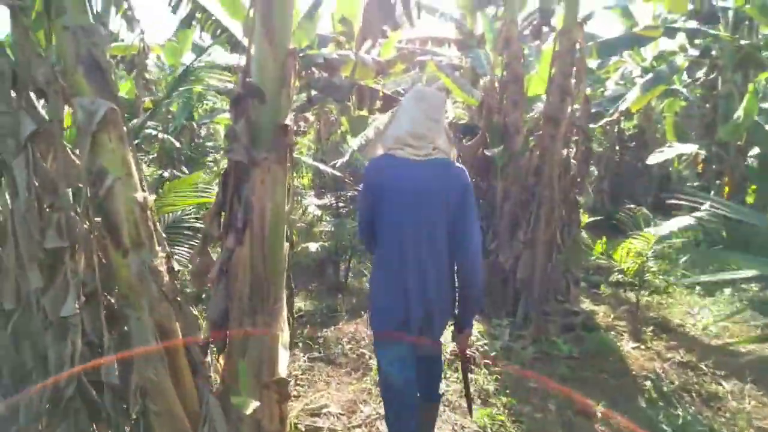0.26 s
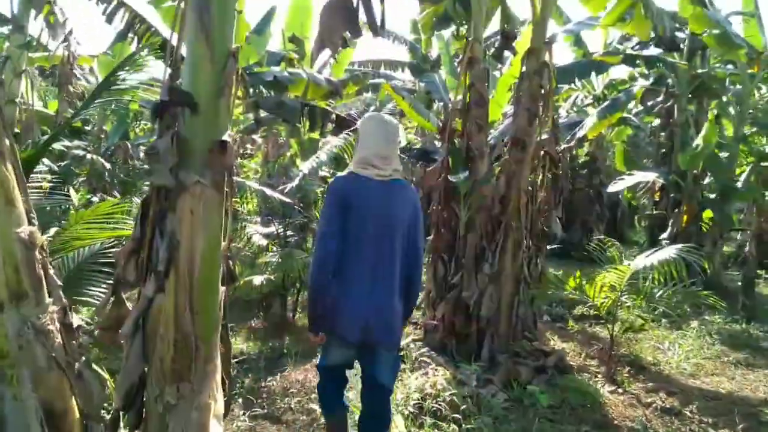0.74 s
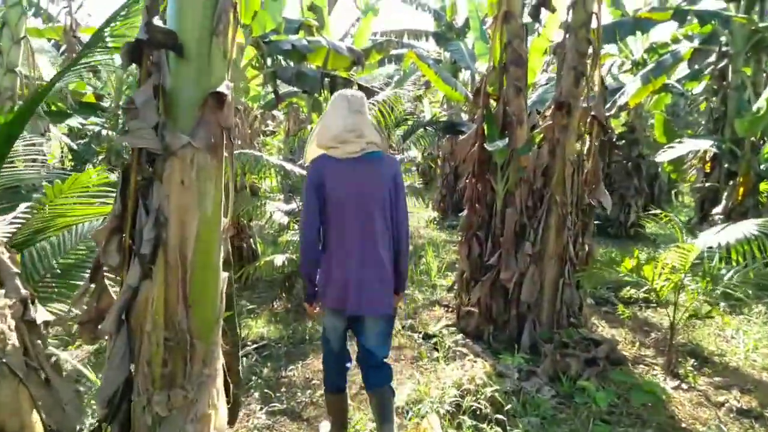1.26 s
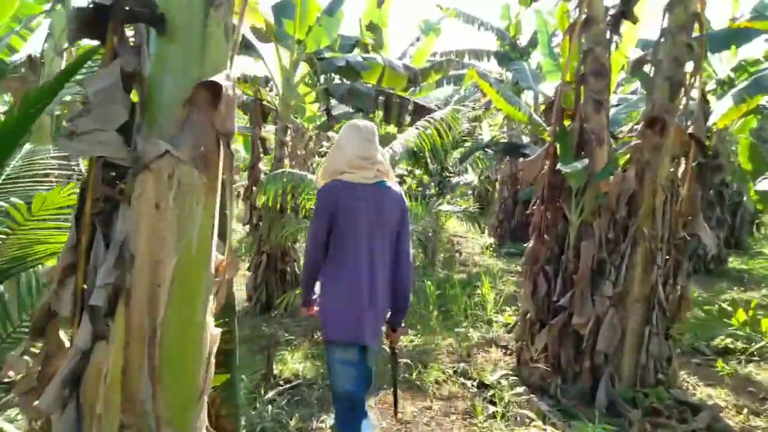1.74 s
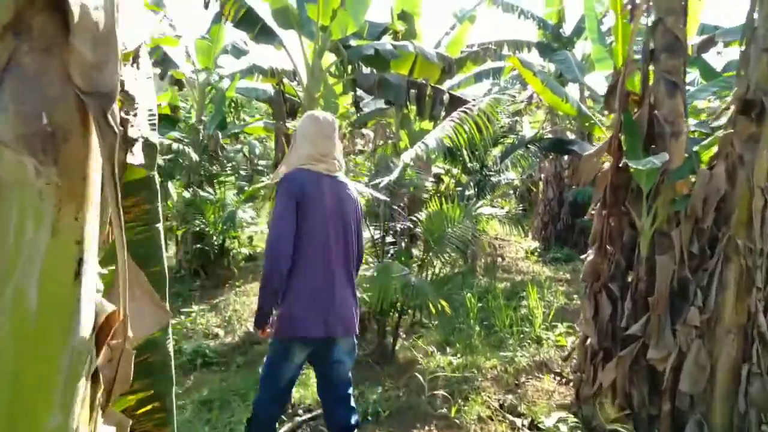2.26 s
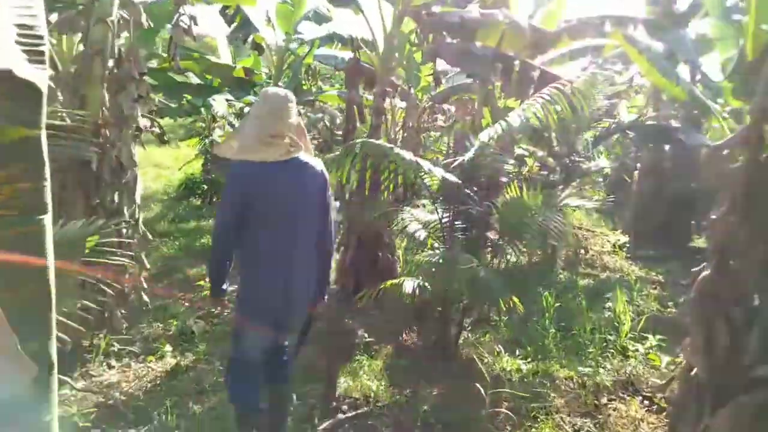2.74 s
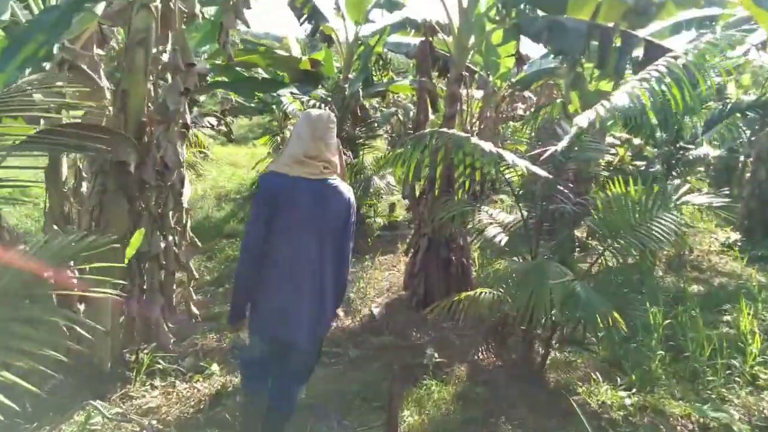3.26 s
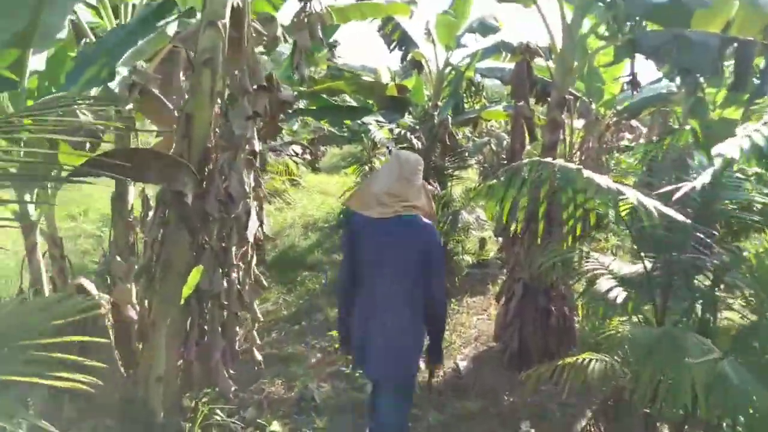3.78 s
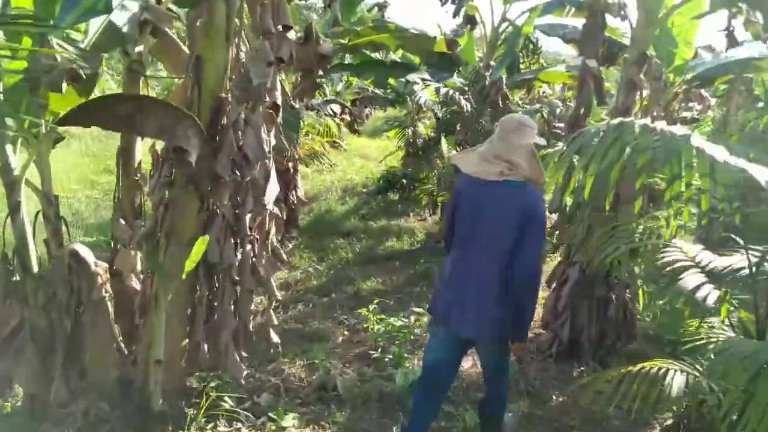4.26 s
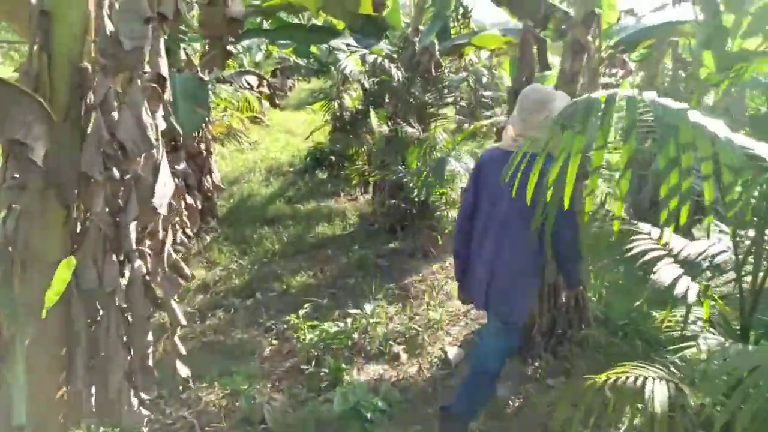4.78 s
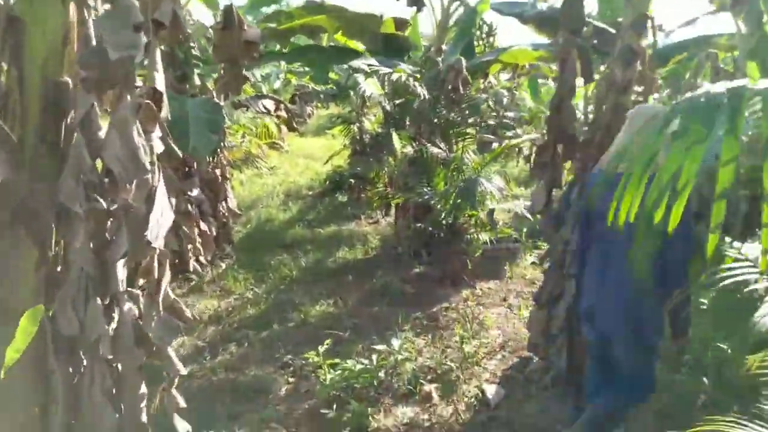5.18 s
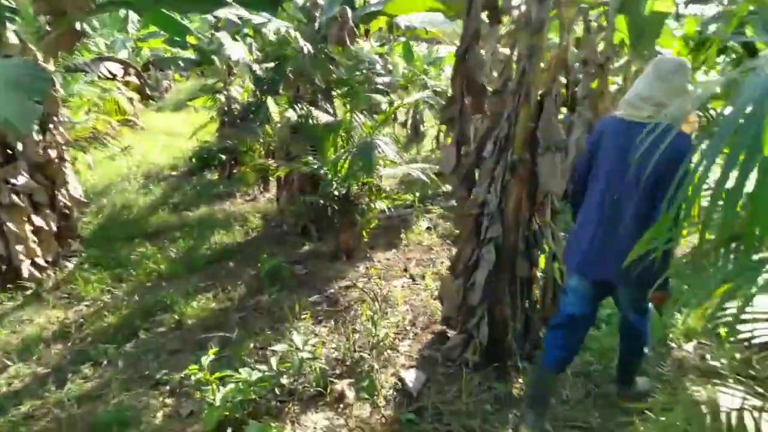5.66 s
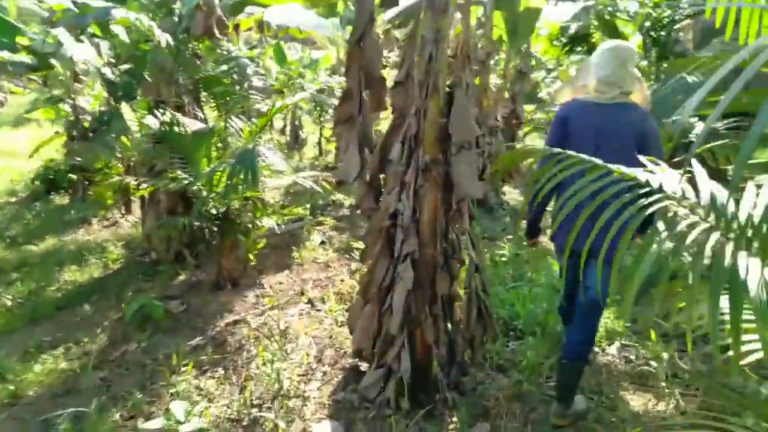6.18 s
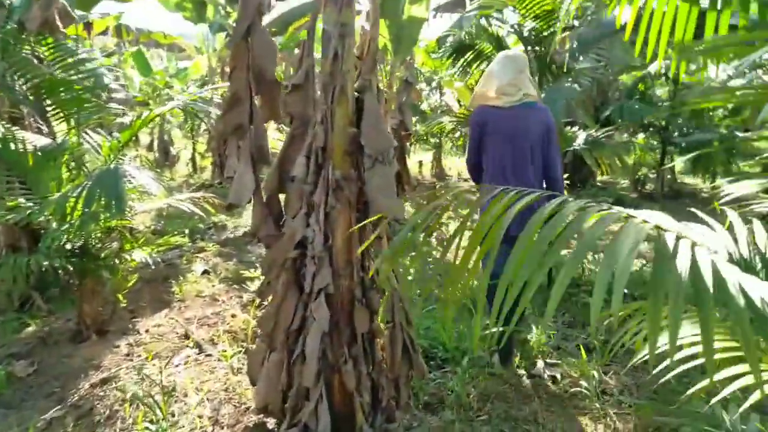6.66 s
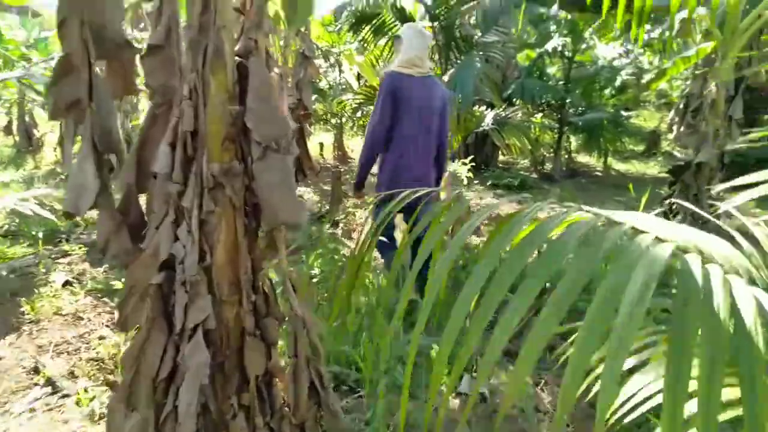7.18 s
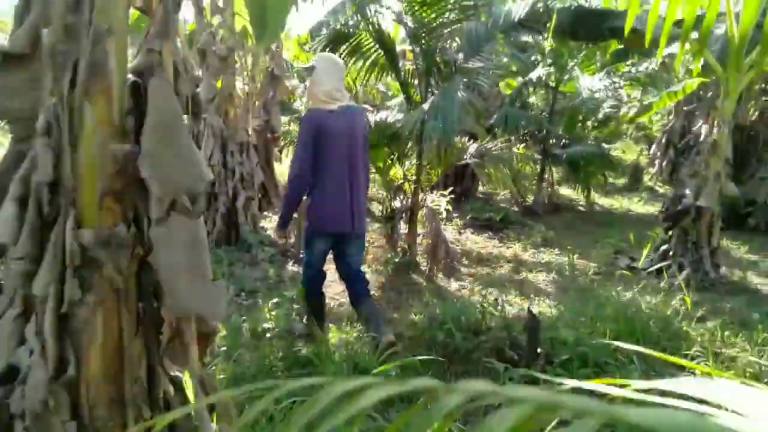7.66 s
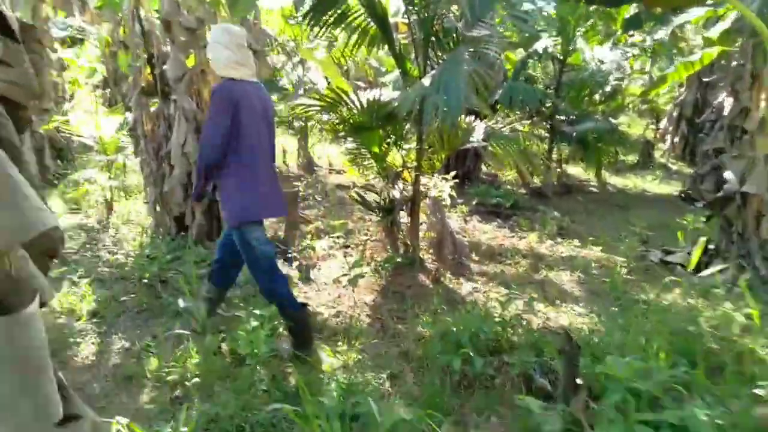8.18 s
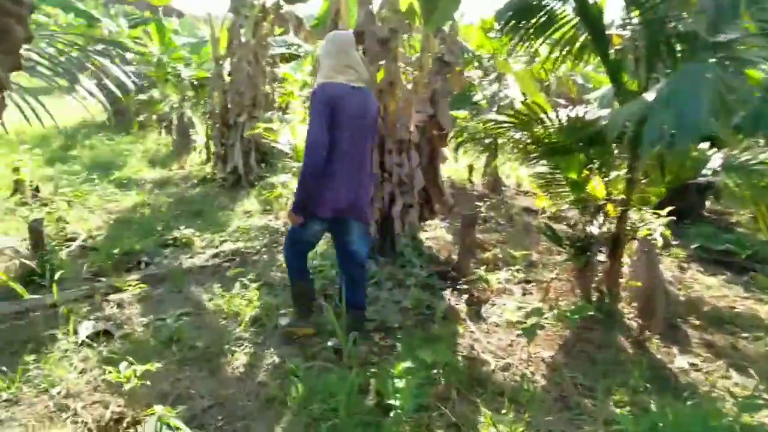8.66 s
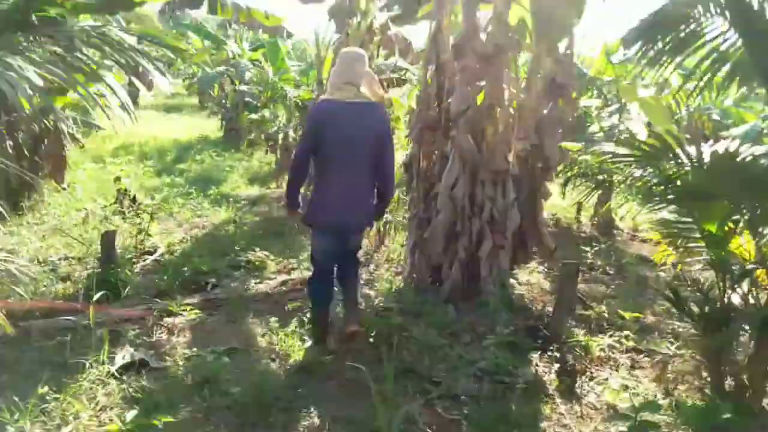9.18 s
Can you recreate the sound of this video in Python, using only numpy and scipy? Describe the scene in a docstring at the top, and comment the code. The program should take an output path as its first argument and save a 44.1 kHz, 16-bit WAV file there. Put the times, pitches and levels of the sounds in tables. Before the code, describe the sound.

Someone moves through dry leaf litter on a plantation path, outdoors and without echo. Short crackling swishes follow one another irregularly, with brittle twig snaps. The handheld microphone picks up scraping, rumbling rubs and knocks ending in low thuds, densest and loudest in the middle. A very faint high insect whine lies at the start, and a distant bird whistles once later.

```python
"""Dry leaves rustle in swishes over a faint insect whine as someone walks a plantation path.
Leaves are showers of random microfractures; twigs are noise-tailed impulses in damped resonances.
Stick-slip friction rubs the handheld microphone's case, and knocks on it end in a short low thud.
Far off a bird gives one thin whistle: it and the insect are wavering sine tones."""
import sys
import numpy as np
from scipy import signal
from scipy.fft import rfft, irfft
from scipy.io import wavfile
from scipy.ndimage import uniform_filter1d

SR = 44100
rng = np.random.default_rng(int(sys.argv[2]) if len(sys.argv) > 2 else 0)


def digitize_waveform(pressure):
    """Quantize a signal to 16-bit integers and store it at the path in sys.argv[1].

    Rows of a 2-D input are taken as channels; values are limited to [-1, 1].
    """
    field = np.atleast_2d(pressure).T
    bounded = np.clip(field, -1, 1)
    quanta = np.round(bounded * 32767).astype(np.int16)
    wavfile.write(sys.argv[1], SR, quanta)


N = 415863
TIME = np.arange(N) / SR
HIT = 2048  # samples in a short sound, and in the design of the colour filters
THUD_HZ, THUD_WIDTH_HZ = 94, 80  # the microphone's resonant high-pass: little passes below it, and hits ring briefly near it


def undb(db):
    """Decibel law: level in dB to amplitude gain."""
    return 10 ** (np.asarray(db) / 20)


def unit(x):
    """Normalization: scale to rms 1."""
    return x / np.sqrt(np.mean(x ** 2))


def curves(table):
    """Linear interpolation: each column after t/s as a curve over time."""
    s, *columns = np.transpose(table)
    return [np.interp(TIME, s, c) for c in columns]


def colour(x, points):
    """Minimum-phase filtering: a causal response through (f/Hz, gain/dB) points."""
    hz, db = np.transpose(points)
    log_hz = np.log(np.fft.rfftfreq(HIT, 1 / SR) + 1)
    log_gain = np.log(undb(np.interp(log_hz, np.log(hz), db)))
    # folding the cepstrum onto positive times makes the response causal
    cepstrum = irfft(log_gain)
    cepstrum[1:HIT // 2] *= 2
    cepstrum[HIT // 2 + 1:] = 0
    response = irfft(np.exp(rfft(cepstrum)))
    return signal.fftconvolve(x, response)[:N]


def resonate(x, hz, width_hz, order):
    """Damped oscillator on a short sound: order 0 passes lows, 1 the band, 2 highs."""
    s = 1j * np.fft.rfftfreq(HIT, 1 / SR) / hz
    return irfft(rfft(x) * s ** order / (1 + s * width_hz / hz + s ** 2))


def hit_level(x, db):
    """Energy normalization: scale a short sound to a level taken over 10 ms."""
    return x * undb(db) * np.sqrt(SR / 100 / np.sum(x ** 2))


def add(track, s, x):
    """Superposition: mix a short sound in at time s."""
    i = int(np.clip(s * SR, 0, N - 1))
    track[i:i + HIT] += x[:N - i]


def crackle(rate, spread_db, ring_ms, bed):
    """Shot noise: random, mostly weak fractures (rate per second) decay over a bed of merged ones."""
    sizes = undb(spread_db * np.minimum(rng.exponential(size=N), 3.5))
    power = (rng.random(N) < rate / SR) * sizes ** 2
    decay = np.exp(-2000 / (ring_ms * SR))  # power falls twice as fast as amplitude
    power = signal.lfilter([1], [1, -decay], power)
    return np.sqrt(power / power.mean() + bed) * rng.standard_normal(N)


def shifting(x, depth_db, size):
    """Spectral modulation: bands about 400 Hz wide come and go over some `size` frames of 6 ms; rms 1."""
    frames = signal.stft(x, nperseg=512)[2]
    field = rng.standard_normal(frames.shape)
    field = uniform_filter1d(field, size=5, axis=0)
    field = uniform_filter1d(field, size=size, axis=1)
    return unit(signal.istft(frames * undb(depth_db * unit(field)))[1][:N])


def stroke(start_s, attack_s, hold_s, sag_db, release_s):
    """Envelope of one movement: linear build-up, a hold that sags by sag_db, exponential release."""
    age = TIME - start_s
    attack_s, hold_s = max(attack_s, .001), max(hold_s, .001)
    held = np.clip((age - attack_s) / hold_s, 0, 1)
    released = np.clip((age - attack_s - hold_s) / release_s, 0, 20)
    return np.clip(age / attack_s, 0, 1) * undb(-sag_db * held) * np.exp(-released)


def tone(hz, db, waver, flutter_db, size):
    """Frequency and amplitude modulation: pitch wavers by the share `waver`, level flutters over `size` samples."""
    drift = unit(uniform_filter1d(rng.standard_normal(N), size=220))
    flutter = uniform_filter1d(rng.standard_normal(N), size=size)
    flutter = unit(uniform_filter1d(flutter, size=size))
    phase = 2 * np.pi * np.cumsum(hz * (1 + waver * drift)) / SR
    return np.sqrt(2) * undb(db + flutter_db * flutter) * np.sin(phase)


# an insect's thin high whine, strongest in the first second and a half: t/s, level before flutter/dB
INSECT_LEVEL = [(0, -67), (1.3, -68), (1.9, -76)]
# a bird's thin rising whistle: t/s, f before waver/Hz, level before flutter/dB
BIRD_WHISTLE = [(6.2, 6750, -68), (6.25, 6950, -59), (6.33, 7120, -56), (6.46, 7650, -72)]


def wildlife():
    """Modulated pure tones: a faint insect whine and one distant bird whistle."""
    insect = tone(9300, curves(INSECT_LEVEL)[0], waver=0.0027, flutter_db=4.0, size=2500)
    hz, db = curves(BIRD_WHISTLE)
    singing = (TIME > BIRD_WHISTLE[0][0]) & (TIME < BIRD_WHISTLE[-1][0])
    return insect + singing * tone(hz, db, waver=0.0059, flutter_db=7.5, size=300)


# the hand's grip creeps on the case all the time: t/s, rumble level/dB
GRIP_CREEP = [(0, -42.5), (.7, -63.5), (1.4, -53), (2.1, -59.5), (2.7, -56), (2.98, -67.5), (3.7, -52.5),
              (4.6, -57.5), (5.2, -45.5), (6.25, -48.5), (6.42, -66.5), (7.6, -72), (7.9, -37), (8.1, -71),
              (8.5, -46.5), (9.4, -58.5)]
# a frond or a finger slides over the case: start t/s, attack and hold length/s,
# rumble level/dB, scrape level/dB (both at the end of the attack)
CASE_SCUFFS = [(0.116, 0.023, -50, -44), (0.17, 0.044, -35.5, -36), (0.203, 0.072, -41, -55),
               (0.687, 0.017, -38, -31), (1.43, 0.058, -45, -45), (1.792, 0.12, -44, -41),
               (2.242, 0.04, -35.5, -52), (3.031, 0.038, -31.5, -41), (3.383, 0.046, -40.5, -53),
               (3.523, 0.052, -37, -53), (3.656, 0.11, -50, -56), (3.806, 0.19, -45.5, -42),
               (4.061, 0.042, -31, -55), (4.111, 0.035, -37.5, -43), (4.27, 0.081, -70, -42.5),
               (4.38, 0.034, -24.5, -31), (4.47, 0.043, -27, -40), (4.592, 0.013, -38, -33.5),
               (4.618, 0.044, -30, -50.5), (4.727, 0.07, -26, -44), (4.905, 0.078, -52, -42.5),
               (5.006, 0.066, -44.5, -45.5), (5.137, 0.13, -50, -45.5), (5.313, 0.041, -58, -30.5),
               (5.614, 0.058, -28, -35.5), (5.674, 0.056, -40, -44), (5.796, 0.017, -30.5, -39),
               (5.82, 0.057, -28, -30.5), (5.967, 0.081, -63, -45), (6.055, 0.016, -41, -55),
               (6.115, 0.09, -29.5, -36), (6.479, 0.012, -38.5, -70), (6.562, 0.041, -46.5, -44),
               (6.655, 0.1, -46, -48), (6.953, 0.035, -45, -41), (7.671, 0.045, -32, -22.5),
               (7.878, 0.016, -50, -36), (8.203, 0.063, -37, -44), (8.284, 0.16, -46, -57),
               (8.693, 0.079, -44.5, -47), (8.959, 0.065, -36, -34), (9.122, 0.11, -48, -42),
               (9.19, 0.046, -39, -50), (9.287, 0.048, -28, -44)]


def case_friction(leaf_gain):
    """Power addition: scuffs, creeping grip and stalks dragged with the leaves give rumble and scrape gains."""
    attack_s = .01
    grip = undb(curves(GRIP_CREEP)[0])
    # scrape of the grip is relative to its rumble; stalks are relative to the leaves they carry
    rumble = grip ** 2 + (leaf_gain * undb(-24.5)) ** 2
    scrape = (grip * undb(-5.5)) ** 2 + (leaf_gain * undb(-17.5)) ** 2
    for s, length_s, rumble_db, scrape_db in CASE_SCUFFS:
        # a negative sag: the scuff grows while it is held
        power = stroke(s, attack_s, length_s - attack_s, sag_db=-1.5, release_s=0.0063) ** 2
        rumble = rumble + power * undb(rumble_db) ** 2
        scrape = scrape + power * undb(scrape_db) ** 2
    return np.sqrt(rumble), np.sqrt(scrape)


# spectral shape of slow jerks on the case: f/Hz, relative level/dB
RUMBLE_SPECTRUM = [(25, -60), (60, -4.5), (110, 0.5), (200, -5.5), (350, -11.5), (600, -23), (1500, -61.5)]
# spectral shape of quick slips on the case: f/Hz, relative level/dB
SCRAPE_SPECTRUM = [(200, -4.5), (450, -0.5), (700, 3), (1100, 0.5), (1800, -2), (2800, -8.5), (6000, -26.5),
                   (12000, -53)]


def rubbing(rumble_gain, scrape_gain):
    """Stick-slip friction on the case: slow jerks rumble, quick slips scrape."""
    jerks = crackle(rate=250, spread_db=5.5, ring_ms=1.0, bed=0.14)
    slips = crackle(rate=600, spread_db=9.5, ring_ms=0.67, bed=0.84)
    slips = shifting(slips, depth_db=4.0, size=7)
    rumble = unit(colour(jerks, RUMBLE_SPECTRUM))
    scrape = unit(colour(slips, SCRAPE_SPECTRUM))
    return rumble_gain * rumble + scrape_gain * scrape


def knock(db, hz, strain_ms, chatter_ms, chatter, catch_share, strain_share, wood_hz, wood):
    """Impact excitation: a stem catches, strains and lets go, rings and chatters, and the microphone's high-
    pass adds a short low ring."""
    ms = 1000 * np.arange(HIT) / SR - 8  # the release is at 0
    release = signal.unit_impulse(HIT, np.argmin(np.abs(ms)))
    catch = signal.unit_impulse(HIT, np.argmin(np.abs(ms + strain_ms)))
    strain = np.maximum(ms + max(strain_ms, .1), 0) * (ms <= 0)
    force = release + catch_share * catch - strain_share * strain / strain.sum()
    push = hit_level(resonate(force, hz, 1.7 * hz, order=0), 0)

    ring_hz = wood_hz * np.exp(0.38 * rng.standard_normal())  # each stem differs
    ring = hit_level(resonate(force, ring_hz, 330, order=1), 0)

    rattle = rng.standard_normal(HIT) * np.exp(-np.abs(ms) / chatter_ms) * (ms > -strain_ms)
    rattle = resonate(rattle, hz, 1.5 * hz, order=0)
    # the chatter is too light to move the whole case, so it carries little bass
    shake = hit_level(resonate(rattle, 160, 200, order=2), 0)

    hardness = min(hz / 900, 1)  # a soft contact hardly rings or chatters
    contact = hit_level(push + hardness * (chatter * shake + wood * ring), db)
    return resonate(contact, THUD_HZ, THUD_WIDTH_HZ, order=2)


# knocks on the case: t/s, contact level over 10 ms before the microphone's high-pass and the case colour/dB, #
# contact hardness as corner f/Hz, strain before it lets go/ms
CASE_KNOCKS = [(0.182, -35, 744, 3.8), (0.199, -34, 2560, 1.2), (0.698, -26, 4000, 1.9),
               (1.181, -20.5, 1940, 0.79), (1.1957, -30, 830, 3.6), (1.304, -20, 1030, 0.99),
               (1.4404, -25, 1560, 1.62), (1.837, -29.5, 1460, 0.53), (1.8624, -16.5, 650, 0.3),
               (1.8754, -26.5, 840, 0.28), (1.8926, -23.5, 1300, 1.4), (2.1568, -14.5, 1070, 2.13),
               (2.1865, -18, 1050, 1.64), (2.257, -13.5, 1050, 2.42), (2.653, -24.5, 1680, 0.98),
               (3.3357, -27.5, 1180, 0.47), (3.4031, -22, 640, 0.88), (3.7028, -20, 2290, 1.06),
               (3.7671, -19.5, 1460, 0.37), (3.8103, -25.5, 1480, 0.28), (3.8236, -26.5, 1170, 0.34),
               (3.8627, -26.0, 530, 0.6), (3.9191, -32, 3500, 1.06), (4.075, -10.5, 224, 2.36),
               (4.1223, -16.5, 2120, 1.48), (4.3, -27, 4000, 0.81), (4.387, -23, 670, 0.31),
               (4.406, -24, 670, 4.5), (4.4108, -14, 615, 1.0), (4.4201, -22, 270, 0.71),
               (4.4822, -17.5, 1100, 0.55), (4.4899, -7, 1120, 1.1), (4.493, -16, 684, 1.1),
               (4.516, -16, 1500, 2.3), (4.522, -23.5, 670, 0.69), (4.6446, -8.5, 800, 0.42),
               (4.649, -16.5, 220, 0.78), (4.783, -18, 202, 6.1), (4.907, -22.0, 496, 0.9),
               (4.941, -23, 1310, 0.94), (5.164, -26.5, 493, 3.2), (5.4113, -13, 1220, 1.1),
               (5.4211, -21, 664, 4.4), (5.4914, -19, 1370, 2.74), (5.6, -26, 380, 0.46),
               (5.637, -18, 340, 5.4), (5.704, -18, 138, 0.6), (5.8494, -35, 950, 0.22),
               (5.882, -27, 199, 5.6), (6.0459, -18, 840, 0.22), (6.0636, -20.5, 170, 0.26),
               (6.1106, -29.5, 380, 2.7), (6.134, -29, 200, 4.6), (6.184, -21.5, 300, 1.0),
               (6.552, -25.5, 110, 0.91), (6.704, -31.5, 1820, 0.95), (6.9768, -41.5, 1830, 1.8),
               (7.342, -29.5, 1620, 0.95), (7.646, -27.5, 3200, 2.8), (7.6857, -19.5, 825, 0.39),
               (7.8966, -28, 4000, 2.4), (8.231, -20.5, 110, 1.0), (8.314, -21.5, 770, 0.96),
               (8.347, -17.0, 500, 0.72), (8.377, -22.5, 680, 0.54), (8.396, -23.5, 377, 0.53),
               (8.954, -15.5, 3200, 1.02), (8.9567, -15.5, 1070, 0.37), (9.1305, -28, 840, 0.45),
               (9.193, -16, 99, 1.1), (9.3204, -29.5, 340, 0.76), (9.352, -26.5, 312, 0.66)]
# how the case passes knocks: f/Hz, gain/dB
CASE_RESPONSE = [(300, 0), (900, -0.5), (2400, 0.5), (3600, -3.5), (6000, -2.5), (14000, -14.5)]


def knocks():
    """Structure-borne transmission: stems and fingers strike the case, which filters the blows."""
    out = np.zeros(N)
    for s, db, hz, strain_ms in CASE_KNOCKS:
        sound = knock(db, hz, strain_ms, chatter_ms=2.95, chatter=0.45, catch_share=0.31,
                      strain_share=0.56, wood_hz=1284, wood=0.18)
        add(out, s - .008, sound)  # the release falls on s
    return undb(0.1) * colour(out, CASE_RESPONSE)


def snap(db, hz, body_db, strain_ms, tail_ms, tail_db):
    """Brittle fracture: fibres give way, the piece breaks, the leaf around it shivers, the stalk recoils."""
    ms = 1000 * np.arange(HIT) / SR - 4  # the break is at 0
    fracture = signal.unit_impulse(HIT, np.argmin(np.abs(ms)))
    fade_ms = np.where(ms < 0, strain_ms, tail_ms)
    shiver = rng.standard_normal(HIT) * np.exp(-np.abs(ms) / fade_ms)
    burst = hit_level(fracture, 0) + hit_level(shiver, tail_db)
    crack = resonate(resonate(burst, hz, 4800, order=1), hz, 7300, order=1)
    recoil = resonate(burst, 1100, 1040, order=0)
    recoil = resonate(recoil, THUD_HZ, THUD_WIDTH_HZ, order=2)
    return hit_level(crack, db) + hit_level(recoil, db + body_db)


# twigs and leaf ribs snapping: t/s, crack level over 10 ms before colour and trim/dB,
# crack centre f/Hz, woody body level relative to the crack/dB
TWIG_SNAPS = [(0.3974, -15.5, 5100, -46), (0.4085, -18, 3970, -30), (0.417, -20, 4840, -37),
              (0.433, -25.5, 3520, -33), (0.6839, -20.5, 4000, -12), (0.7045, -11.5, 6530, -22.5),
              (0.854, -34.5, 3020, 0.5), (0.879, -42, 3000, 3), (0.94, -31.5, 4540, -23),
              (0.9952, -17.5, 4760, -27), (1.283, -26, 5430, -27), (2.322, -11, 7700, -17),
              (2.3286, -14, 5330, -18), (2.485, -34.5, 3450, -11), (2.7963, -24, 3600, -20),
              (3.095, -30, 3400, -7), (3.1036, -22, 3150, -41), (3.9177, -23.5, 3760, -2.5),
              (4.147, -24, 4840, -22), (4.4896, -26, 5840, -12), (4.6442, -36, 6400, -14),
              (4.756, -21, 13100, -34), (4.7736, -19, 12300, -21), (5.011, -31.5, 2840, -27),
              (5.464, -29, 4200, -35), (5.803, -26, 12900, -31), (6.0454, -19, 3600, 3.5),
              (6.187, -24, 3400, -1.5), (6.408, -40, 3940, -26), (6.5004, -22, 12700, -46),
              (7.0204, -28.5, 2850, -19), (7.118, -20, 12800, -46), (7.282, -31.5, 3120, -37),
              (7.699, -10, 5900, -17), (7.706, -16, 4130, -6), (7.8507, -16.5, 13200, -28),
              (7.862, -22, 13100, -27), (7.8938, -22, 4500, -7.5), (8.1743, -16, 13100, -59),
              (8.1806, -17, 12800, -38), (8.532, -23.5, 5300, -16.5), (8.563, -20.5, 5450, -28),
              (8.9985, -17, 5130, -11), (9.0047, -8.5, 7450, -19), (9.278, -22, 13100, -38),
              (9.3482, -9.5, 12400, -28), (9.354, -23, 12200, -24)]
# spectral colour of all snaps: f/Hz, gain/dB
SNAP_RESPONSE = [(2500, 1), (3900, -3), (5400, -2.5), (8000, -11), (10500, -9), (14000, -16), (16000, -15)]


def snaps():
    """Impulsive radiation: twigs and leaf ribs break one by one."""
    out = np.zeros(N)
    for s, db, hz, body_db in TWIG_SNAPS:
        sound = snap(db, hz, body_db, strain_ms=0.23, tail_ms=2.6, tail_db=-5)
        add(out, s - .004, sound)  # the break falls on s
    return undb(-3.5) * colour(out, SNAP_RESPONSE)


# the undergrowth keeps stirring between swishes, most where it is thick: t/s, body level/dB
UNDERGROWTH_STIR = [(0, -37), (.45, -86), (.62, -52.5), (1.3, -58), (2.1, -62.5), (2.63, -49), (3.0, -53),
                    (3.3, -54), (3.9, -72), (4.08, -58.5), (4.7, -52.5), (5.15, -45), (5.9, -48),
                    (6.42, -57), (6.92, -56.5), (7.1, -42.5), (8.6, -43.5), (8.85, -48), (9.2, -46)]
# a boot or a leg pushes through leaves: start t/s, swell/s, hold/s,
# body level at full swell/dB, treble level relative to the body/dB
LEAF_SWISHES = [(0.125, 0.063, 0.032, -40, -16), (0.202, 0.24, 0.066, -35, -8.5),
                (0.473, 0.041, 0.065, -40, -7), (0.621, 0.0036, 0.0058, -32.5, -22),
                (0.855, 0.033, 0.078, -44.5, -16), (0.98, 0.0066, 0.095, -30, -5),
                (1.07, 0.023, 0.13, -41, -3.5), (1.182, 0.11, 0.039, -38.5, 0),
                (1.321, 0.038, 0.26, -38.5, -14), (1.655, 0.0037, 0.013, -32, -35),
                (1.673, 0.023, 0.09, -36.5, -2.5), (1.792, 0.0071, 0.06, -35.5, -11.5),
                (1.893, 0.082, 0.088, -46.5, -37), (2.143, .06, 0.12, -47, -7),
                (2.251, 0.22, 0.066, -36, -7.5), (2.53, 0.022, 0.039, -41, -10),
                (2.678, .015, .26, -37.5, -10.5), (3.026, 0.048, 0.048, -33, -7.5),
                (3.105, 0.035, 0.07, -40.5, -12), (3.323, 0.016, 0.11, -46.5, -41),
                (3.464, .01, 0.092, -38, -18), (3.56, 0.048, 0.036, -38, -0.5),
                (3.643, 0.037, 0.037, -36, -3.5), (3.702, 0.035, 0.22, -44, -9.5),
                (3.925, 0.021, 0.092, -45, -12), (4.126, 0.019, .11, -32.5, -8),
                (4.258, 0.045, 0.022, -29.5, -8), (4.316, 0.058, 0.054, -37, -6.5),
                (4.634, 0.007, 0.0066, -30, -7), (4.81, 0.044, 0.16, -41.5, -8.5),
                (4.987, 0.021, 0.14, -36.5, -30), (5.197, 0.082, 0.11, -38, -6.5),
                (5.397, 0.017, 0.13, -40, -8), (5.808, 0.045, 0.037, -39, -5),
                (5.951, 0.049, 0.047, -38, -9.5), (6.044, 0.12, 0.075, -46.5, -1),
                (6.229, 0.1, 0.033, -42, -5.5), (6.401, 0.0024, 0.0074, -43, 2.5),
                (6.457, 0.12, 0.032, -39.5, -3), (6.544, 0.018, 0.047, -36, -2),
                (6.601, 0.025, 0.12, -40, -7.5), (6.758, 0.017, 0.083, -36, -13),
                (6.957, 0.026, 0.092, -40.5, -9), (7.092, 0.061, 0.055, -40.5, -5),
                (7.185, 0.052, 0.058, -33, -14), (7.316, 0.043, 0.089, -40.5, -11),
                (7.48, 0.027, 0.053, -39, -3.5), (7.58, 0.034, 0.024, -38, -7),
                (7.68, 0.03, 0.011, -28, -2.5), (7.76, 0.067, 0.039, -42, 1.5),
                (7.994, 0.019, 0.15, -36.5, -30), (8.153, 0.12, 0.18, -36.5, -6.5),
                (8.412, 0.11, 0.064, -34, -8.5), (8.576, 0.017, 0.12, -39.5, -7.5),
                (8.742, 0.048, 0.028, -39, -11), (8.905, 0.0084, 0.13, -37, -7),
                (9.045, 0.062, 0.028, -40.5, 0.5), (9.374, 0.0071, 0.03, -36.5, -2)]


def leaf_motion():
    """Power addition: swishes on top of a slow stir give the gains of the leaves' body and treble."""
    stir_db = curves(UNDERGROWTH_STIR)[0]
    # treble is 7 dB under a stir of -41 dB and gains 0.35 dB on it per dB of stir
    stir_treble_db = -7 + 0.35 * (stir_db + 41)
    body = undb(stir_db) ** 2
    treble = body * undb(stir_treble_db) ** 2
    for s, swell_s, hold_s, db, treble_db in LEAF_SWISHES:
        swish = undb(db) * stroke(s, swell_s, hold_s, sag_db=5, release_s=0.0091)
        body = body + swish ** 2
        treble = treble + swish ** 2 * undb(treble_db) ** 2
    return np.sqrt(body), np.sqrt(treble)


# spectral shape of cracking dry blades: f/Hz, relative level/dB
BLADE_SPECTRUM = [(200, -53), (600, -18.5), (1000, -11), (1700, -12), (2400, -2), (3200, 3), (4300, -6.5),
                  (5500, -0.5), (6300, -9.5), (7200, -35.5)]
# spectral shape of sifting fine edges: f/Hz, relative level/dB
EDGE_SPECTRUM = [(5000, -6), (6600, 3), (8000, -2), (9600, 0.5), (12500, -4), (14200, -17), (15800, -38.5)]


def leaves(body_gain, treble_gain):
    """Superposed microfractures: dry blades crack, fine edges sift; leaves take turns and shift the colour."""
    cracks = crackle(rate=1200, spread_db=6.5, ring_ms=0.6, bed=0.5)
    sifting = crackle(rate=2200, spread_db=4.5, ring_ms=0.25, bed=0.88)
    body = unit(colour(shifting(cracks, depth_db=2.5, size=7), BLADE_SPECTRUM))
    treble = unit(colour(shifting(sifting, depth_db=4, size=5), EDGE_SPECTRUM))
    return body_gain * body + treble_gain * treble


def scene():
    """Linear superposition in the open air, without echo."""
    body, treble = leaf_motion()
    background = wildlife()
    handling = rubbing(*case_friction(body)) + knocks()
    litter = snaps() + leaves(body, treble)
    return (background + handling + litter)[None]


# the recorder's noise suppressor turns down a band under its threshold: upper edge f/Hz, threshold level/dB
SUPPRESSOR_BANDS = [(800, -59), (2400, -61), (7000, -63), (16000, -66)]


def suppress(x):
    """Downward expansion: each band is turned down, by 20 dB at most, while its own level is low."""
    hz, _, frames = signal.stft(x, nperseg=512)
    gain, low_hz = np.ones(frames.shape), 0
    for high_hz, threshold_db in SUPPRESSOR_BANDS:
        band = (hz >= low_hz) & (hz < high_hz)
        power = uniform_filter1d(np.sum(np.abs(frames[band]) ** 2, axis=0), size=5)
        excess = (power / undb(threshold_db) ** 2) ** 2
        gain[band] = np.maximum(excess / (1 + excess), undb(-20))
        low_hz = high_hz
    return signal.istft(frames * gain)[1][:N]


def record(dry):
    """Band limiting and overload: deep bass is lost, quiet bands suppressed, peaks clipped, the top cut."""
    bass_cut_hz, top_hz = 36, 15650
    bass_cut = signal.butter(2, bass_cut_hz, "highpass", fs=SR, output="sos")
    thin = signal.sosfilt(bass_cut, dry[0])
    clipped = np.clip(suppress(thin), -.8, .8)
    top_cut = signal.ellip(8, .2, 70, top_hz, fs=SR, output="sos")
    return signal.sosfilt(top_cut, clipped)[None]


dry = scene()
out = record(dry)
digitize_waveform(out)
```